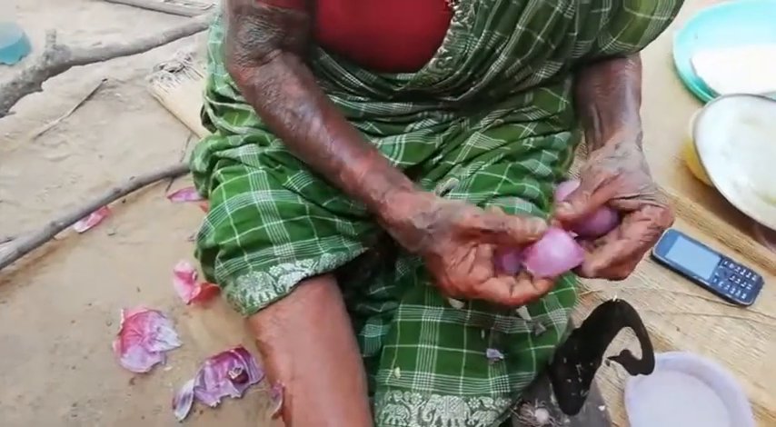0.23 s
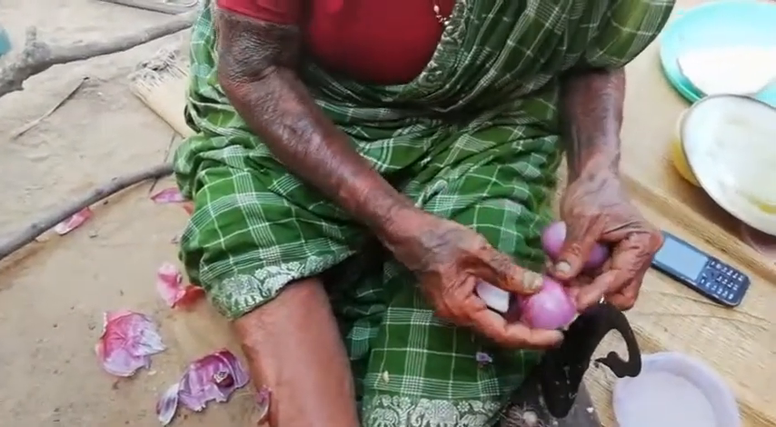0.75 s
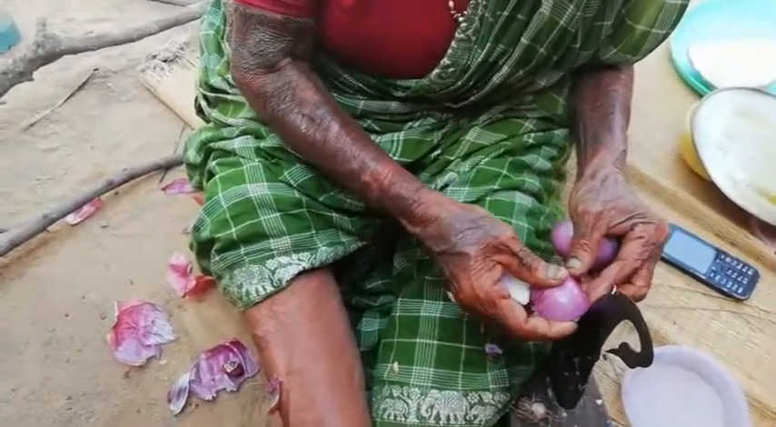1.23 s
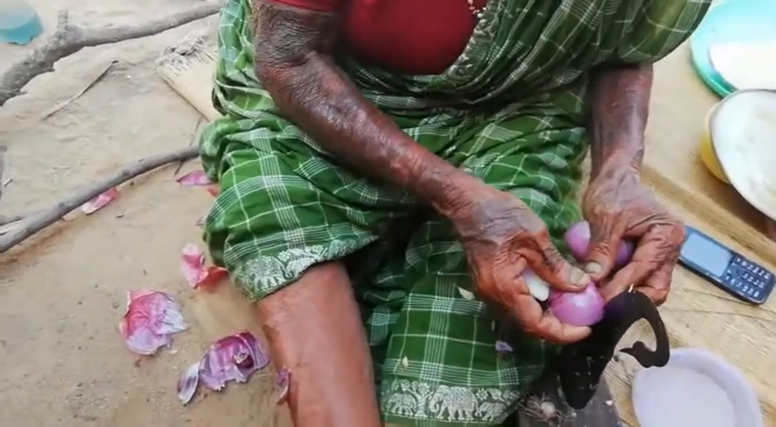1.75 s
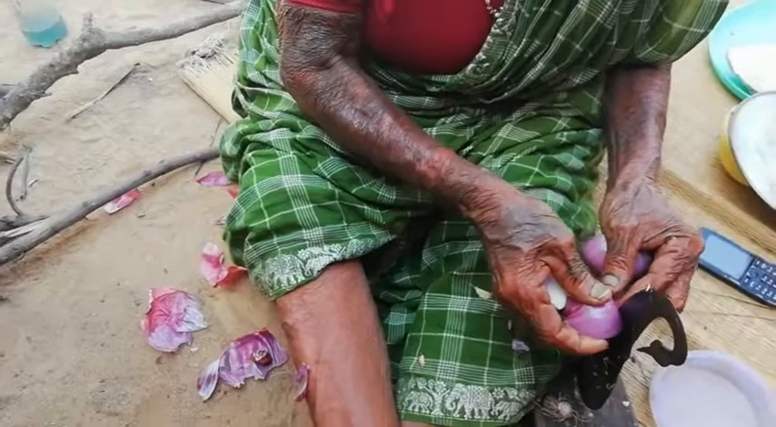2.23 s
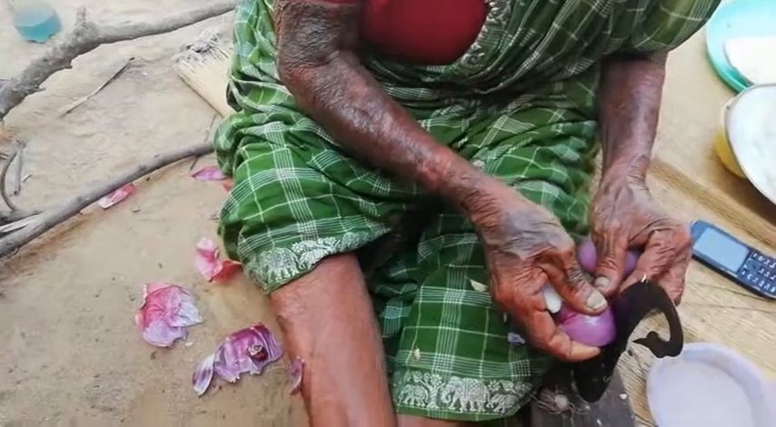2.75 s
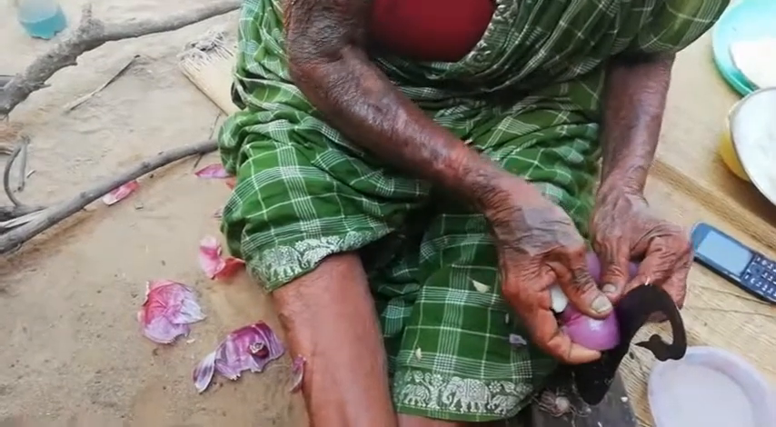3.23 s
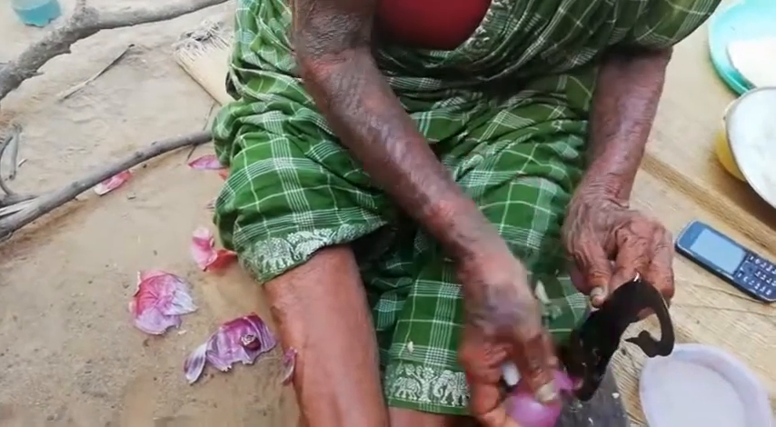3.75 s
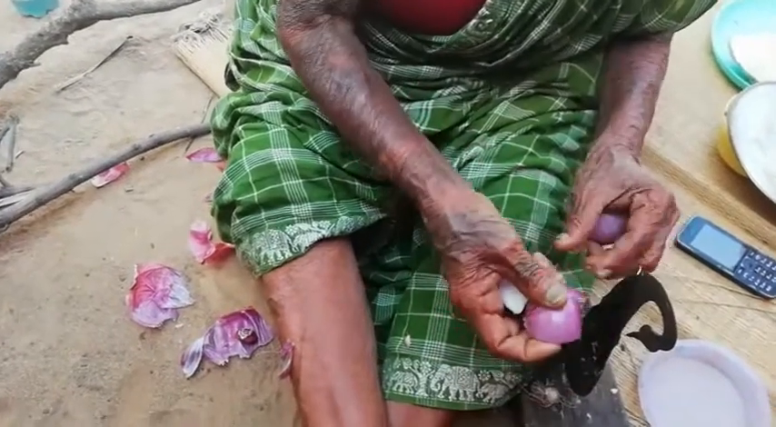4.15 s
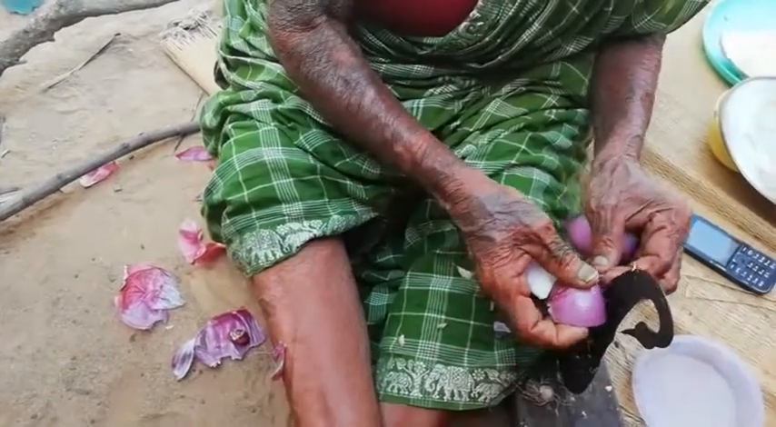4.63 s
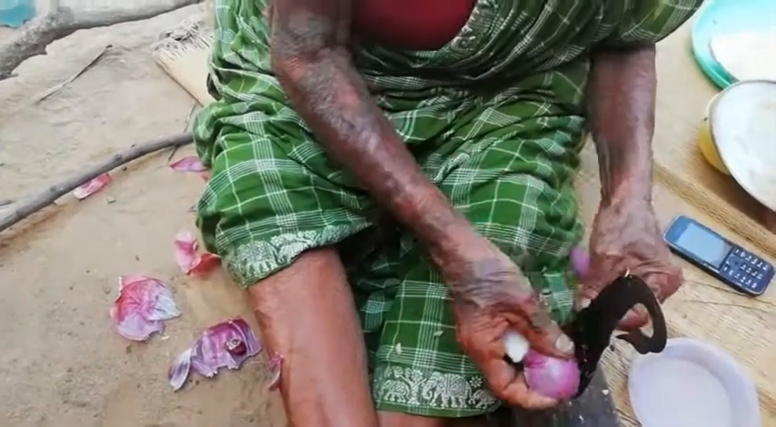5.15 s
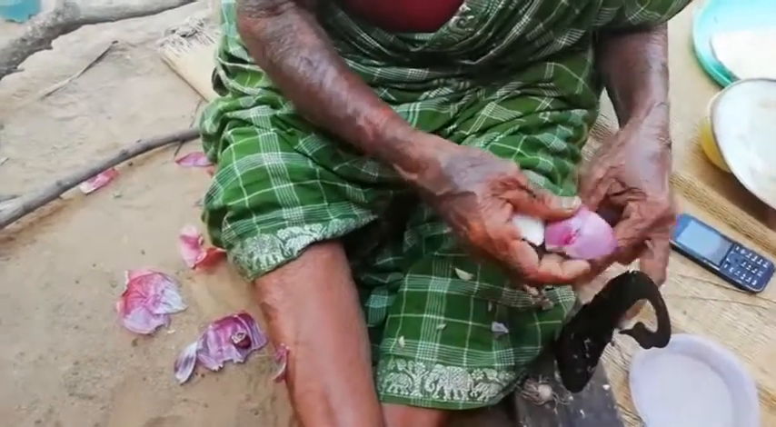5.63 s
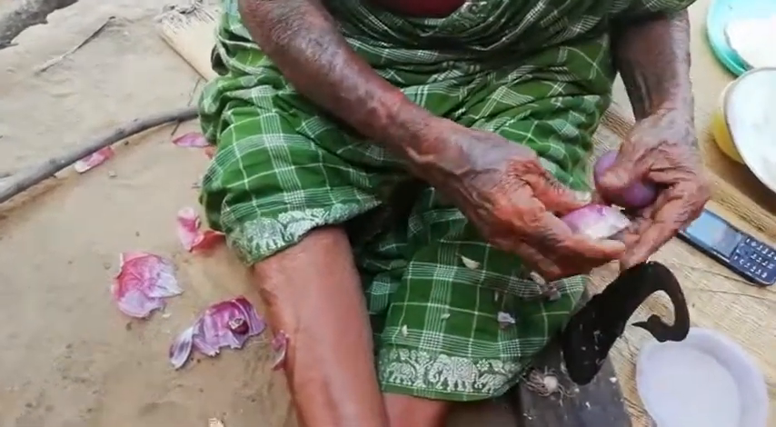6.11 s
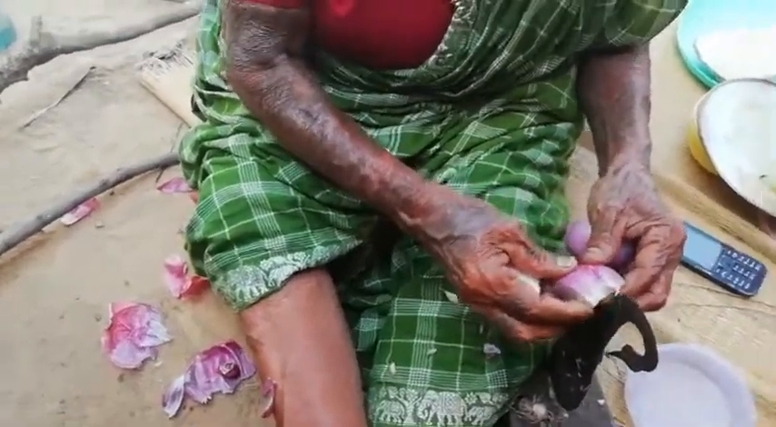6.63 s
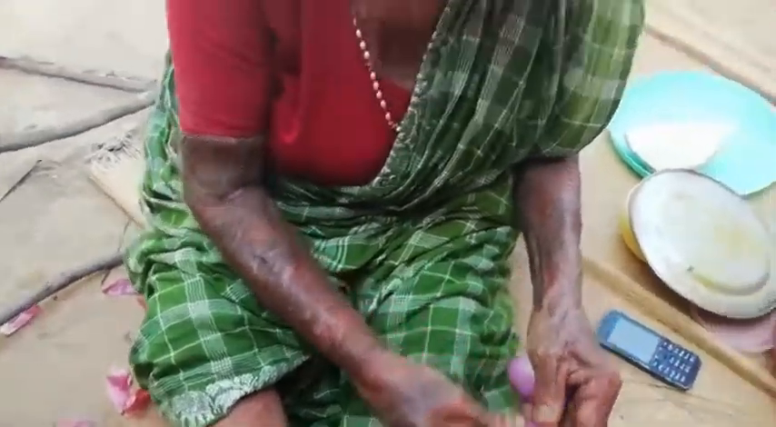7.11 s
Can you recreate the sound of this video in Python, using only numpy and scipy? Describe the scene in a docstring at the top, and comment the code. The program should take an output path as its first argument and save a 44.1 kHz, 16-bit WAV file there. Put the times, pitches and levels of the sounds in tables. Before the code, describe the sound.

Close to the microphone, an onion is peeled by hand, its skin rasping softly and breaking with small crisp snaps. About a second in, a hen a few steps to the right gives one drawn-out falling squawk, then clucks softly while chicks peep and whine. A far engine putters under faint birds and outdoor rumble and hiss. The peeling is loudest near the end.

```python
"""Peeling an onion in a farmyard

Close by, onion skin rasps as its fibres fracture and snaps as crisp layers break. A hen gives one drawn-out
squawk, then clucks softly, while chicks peep and whine: each voice is a vibrating membrane filtered by a
throat. Far away, the firings of a single-cylinder engine ring its exhaust. Soft low knocks sound now and then;
distant birds and outdoor rumble and hiss lie behind."""
import sys
import numpy as np
from scipy import signal
from scipy.fft import rfft, irfft, next_fast_len
from scipy.io import wavfile
from scipy.ndimage import uniform_filter1d

SR = 44100
rng = np.random.default_rng(int(sys.argv[2]) if len(sys.argv) > 2 else 0)


def persist_wave(psi):
    """Save psi, clipped to +-1, as 16-bit WAV."""
    counts = np.round(np.clip(psi, -1, 1) * 32767).astype(np.int16)
    wavfile.write(sys.argv[1], SR, np.atleast_2d(counts).T)


N = 325017
TIME = np.arange(N) / SR


# Peeling strokes: strongest_s, rise_s, fall_s, level_db (all table levels are relative)
STROKES = [(1.474, 0.077, 0.058, -48.5), (1.837, 0.2, 0.28, -50.5), (2.199, .016, 0.079, -46.5),
           (2.272, 0.16, 0.084, -45), (2.623, 0.2, 0.12, -49.5), (3.083, 0.11, 0.27, -44),
           (3.421, 0.16, 0.21, -43), (3.725, 0.19, 0.46, -58), (4.94, 0.11, 0.067, -44.5),
           (6.821, 0.42, 0.63, -55.5), (7.052, 0.028, 0.062, -40.5), (7.099, 0.13, 0.06, -35),
           (7.257, 0.035, 0.049, -34.5)]
# Spectrum of the peeling rasp as heard, microphone colour included: frequency_hz, gain_db
RASP_SPECTRUM = [(530, -36.5), (900, -31), (1400, -20), (1750, -19), (2200, -16), (2390, -16), (3670, -17),
                 (4940, -6), (6120, -6.5), (6980, -6), (7960, -25), (9980, -15), (15500, -19)]
# Modes of the damped blade, ringing under the skin: frequency_hz, width_hz, gain_db
BLADE_MODES = [(1483, 150, 6), (2244, 57, 1)]

def peeling(fibres_per_s=4000, size_db=4.0, patchy_db=3.5, swell_db=25):
    """Shot noise: skin tears fibre by fibre, a clumped crackle that swells and fades with each stroke."""
    power = np.zeros(N)
    for s, rise_s, fall_s, level_db in STROKES:
        stroke = [(s - rise_s, level_db - swell_db), (s, level_db), (s + fall_s, level_db - swell_db)]
        at, gate = span(stroke, 0.0033)
        power[at] += (gate * from_db(in_time(stroke, TIME[at])[0])) ** 2
    sizes = from_db(size_db * np.minimum(rng.exponential(1, N), 5) + patchy_db * drift(150, N))
    fractures = sizes * rng.choice([-1, 1], N) * (rng.random(N) < fibres_per_s / SR)
    crackle = np.sqrt(power) * rms_one(coloured(fractures, RASP_SPECTRUM))
    return crackle + sum(from_db(db) * resonance(crackle, hz, width) for hz, width, db in BLADE_MODES)


# Breaks in the skin: start_s, level_db, pan_db, edge_db
SNAPS = [(2.275, -27.5, -13.5, -15), (3.3811, -18, -2, -18), (3.4415, -25.5, -4, -13),
         (3.4602, -15.5, -10.5, -3), (3.981, -31, -9, -7), (5.6262, -18, -11, -6.5), (6.214, -35, -13, -2),
         (7.0446, -29, -6, -14), (7.093, -20, 6, -22), (7.102, -17, -11.5, -15), (7.271, -21.5, -1, -16),
         (7.277, -27, 1, -4)]
# Resonances of a snap: frequency_hz, width_hz, gain_db
SNAP_MODES = [(2590, 1100, 7), (5380, 510, 15.5), (6220, 430, 15)]

def snaps(decay_s=0.00097, gain_db=2, edge_hz=11000):
    """Impulsive excitation: a crisp layer breaks, and a millisecond burst rings damped modes."""
    out, t = np.zeros((2, N)), TIME[:SR // 50]
    band = signal.butter(2, [3300, 7600], "band", fs=SR, output="sos")
    for s, level_db, pan_db, edge_db in SNAPS:
        burst = rng.standard_normal((2, len(t))) * np.exp(-t / decay_s)
        ring = sum(from_db(db) * resonance(burst, hz, width) for hz, width, db in SNAP_MODES)
        crack = signal.sosfilt(band, ring) + from_db(edge_db) * resonance(burst, edge_hz, 4000)
        crack /= abs(crack).max(1, keepdims=True)
        out[:, int(s * SR):][:, :len(t)] += from_db(level_db + gain_db) * panned(crack, pan_db)
    return out


# Course of the hen's squawk: time_s, pitch_hz, lower_partials_db, upper_partials_db
SQUAWK = [(0.93, 486.6, -50, -59), (0.955, 458, -46.5, -60.5), (0.986, 409.7, -40.5, -46),
          (1.02, 423, -40.5, -41.5), (1.06, 444.8, -35, -33.5), (1.155, 423.3, -40, -33),
          (1.18, 404.7, -28, -29.5), (1.264, 370, -34, -31), (1.31, 360.8, -34.5, -37.5),
          (1.344, 353, -36.5, -48), (1.438, 355.2, -49.5, -60), (1.53, 329.9, -49.5, -60),
          (1.62, 313, -59.5, -80)]
# Her throat's response: frequency_hz, gain_db
SQUAWK_THROAT = [(400, -24.5), (600, -18.5), (800, -8.5), (1100, -19.5), (1500, -4), (2200, -2.5),
                 (2600, -3), (3200, 5.5), (3900, -16.5), (4900, -2), (5600, -8), (7000, -2.5),
                 (8000, -20.5), (15000, -40)]
# Her beak opens and closes: time_s, resonance_hz
BEAK_FORMANT = [(.96, 1320), (1.14, 1320), (1.17, 1640), (1.33, 1425), (1.42, 1200), (1.5, 892),
                (1.61, 810)]
# An upper throat resonance rises and rings out: time_s, resonance_hz, gain_db
SHRILL_FORMANT = [(1.21, 4600, -3), (1.26, 4880, 14.5), (1.32, 5040, 4)]
# She starts hoarse and clears: time_s, rasp_db (against the upper partials)
HOARSENESS = [(.99, 1), (1.06, -17), (1.18, -16), (1.32, -14)]

def squawk(beak_db=11, half_width_hz=220, lower_db=-1, upper_db=-2):
    """Source and filter: two moving formants shape a falling call that swells as the beak opens."""
    at, gate = span(SQUAWK, 0.022)
    pitch, low_db, high_db = in_time(SQUAWK, TIME[at])
    beak_hz, = in_time(BEAK_FORMANT, TIME[at])
    shrill_hz, shrill_db = in_time(SHRILL_FORMANT, TIME[at])
    rasp_db, = in_time(HOARSENESS, TIME[at])
    partials, hz = syrinx(pitch, SQUAWK_THROAT, jitter=0.003, flutter_db=3.0, count=32)
    for formant_hz, boost_db in [(beak_hz, beak_db), (shrill_hz, shrill_db)]:
        partials *= from_db(boost_db / (1 + ((hz - formant_hz) / half_width_hz) ** 2))
    upper_share = np.clip((hz - 1.1 * beak_hz) / 300, 0, 1)
    rasp = from_db(rasp_db) * rms_one(coloured(rng.standard_normal(N), SQUAWK_THROAT))[at]
    low = evened((partials * (1 - upper_share)).sum(0))
    high = evened((partials * upper_share).sum(0))
    out = np.zeros(N)
    out[at] = gate * (from_db(low_db + lower_db) * low + from_db(high_db + upper_db) * (high + rasp))
    return out


# The hen's clucks: start_s, length_s, pitch_hz, throat_hz, level_db, roughness
CLUCKS = [(2.53, 0.071, 338.3, 830, -47, 0.23), (2.657, 0.13, 361, 990, -47.5, 0.18),
          (2.814, 0.034, 370, 730, -50.5, 0.3), (3.281, 0.052, 263.4, 736, -41.5, 0.12),
          (3.305, 0.11, 342.5, 1080, -42.5, 0.13), (4.188, .12, 293.6, 710, -51, 0.46),
          (4.602, 0.171, 278, 255, -48.5, 0.13), (4.665, 0.28, 268.2, 953, -53, 0.16),
          (5.82, 0.083, 383, 720, -60, 0.15), (6.053, 0.15, 337.4, 947, -58, 0.2)]
# Her throat's response in a cluck: frequency_hz, gain_db
CLUCK_THROAT = [(250, 5.5), (500, -7), (700, -8.5), (1000, -3.5), (1300, -14), (3200, 9.5), (6000, -25)]

def clucks(pitch_sag=0.09, width_hz=190, upper_hz=1750, upper_db=-25):
    """Formant filtering: short hoarse tones, sagging in pitch, pass through two throat resonances."""
    out = np.zeros(N)
    for start, length, pitch_hz, throat_hz, level_db, roughness in CLUCKS:
        progress = np.linspace(0, 1, int(length * SR))
        pitch = pitch_hz * (1 - pitch_sag * progress)
        partials, _ = syrinx(pitch, CLUCK_THROAT, jitter=0.02, flutter_db=3.5, count=16)
        source = rms_one(partials.sum(0)) + 4 * roughness * rng.standard_normal(len(pitch))
        voice = resonance(source, throat_hz, width_hz)
        voice -= from_db(upper_db) * resonance(source, upper_hz, 1900)
        envelope = np.minimum(progress / 0.027, 1) * np.sqrt(1 - progress)
        out[int(start * SR):][:len(voice)] += from_db(level_db) * rms_one(voice) * envelope
    return out


# Chicks' peeps: start_s, loud_from_s, mid_fall_s, end_s, top_hz, bottom_hz, fall_s,
# level_db, overtones_db
PEEPS = [(1.628, 1.682, 1.693, 1.79, 3490, 2488, .011, -33, -7),
         (1.982, 1.999, 1.987, 2.035, 6000, 2680, .011, -37, -26),
         (1.992, 2.04, 2.066, 2.17, 3370, 2530, .013, -35, -13),
         (2.293, 2.318, 2.32, 2.4, 4500, 2300, .021, -35, -14),
         (4.03, 4.094, 4.103, 4.21, 3760, 2495, .012, -36, -6),
         (4.455, 4.496, 4.525, 4.62, 3430, 2536, .013, -37.5, -8),
         (4.97, 5.028, 5.042, 5.07, 3500, 1800, .0062, -39, -3),
         (6.272, 6.358, 6.37, 6.41, 3660, 2120, .01, -44.5, -9)]
# Spectral envelope of a peep as heard: frequency_hz, gain_db
PEEP_SPECTRUM = [(2500, -3), (3300, 0), (4400, -7), (5000, -26), (5600, -8), (6900, 1), (7700, -20),
                 (11000, -42)]

def peeps(scoop_hz=325, scoop_s=0.0161, swell_s=0.0081, hold_s=0.0053):
    """Frequency glide: a high note scoops up and drops in an S-curve; partway down it is heard suddenly louder."""
    out = np.zeros(N)
    for start, loud_from, middle, end, top_hz, bottom_hz, fall_s, level_db, overtones_db in PEEPS:
        t = np.arange(start, end, 1 / SR)
        pitch = bottom_hz + (top_hz - bottom_hz) / (1 + np.exp((t - middle) / fall_s))
        pitch -= scoop_hz * np.exp((start - t) / scoop_s)
        faint_db = np.interp(t, [loud_from - swell_s, loud_from], [6.5, 0])
        attack_db = np.interp(t - start, [0, 0.019], [13, 0])
        release_db = np.interp(t, [middle + hold_s, end], [0, 13.5])
        envelope_db = level_db - faint_db - attack_db - release_db
        call = np.column_stack([t, pitch, envelope_db, overtones_db + faint_db])
        out += chick(call, PEEP_SPECTRUM, rasp=0.55, jitter=0.015, flutter_db=3.5, count=3)
    return out


# Chicks' soft whines: start_s, length_s, level_db, overtones_db
WHINES = [(2.439, 0.16, -45.5, 11), (2.8, 0.3, -48.5, 3.5), (3.205, 0.21, -47, 3.5),
          (3.612, .24, -46.5, 12)]
# A chick's throat in a whine: frequency_hz, gain_db
WHINE_THROAT = [(1400, 0.5), (2900, 1), (4500, 2), (6000, 1), (7600, -13), (9500, -24)]

def whines(start_hz=1292, top_hz=1520, rise_s=0.05, attack_s=0.044, hold_s=0.12, fade_db=11):
    """Exponential approach: the pitch rises and levels off while the call swells, holds and fades."""
    out = np.zeros(N)
    for start, length, level_db, overtones_db in WHINES:
        t = np.arange(0, length, 1 / SR)
        pitch = top_hz + (start_hz - top_hz) * np.exp(-t / rise_s)
        below_db = fade_db * np.interp(t, [0, attack_s, attack_s + hold_s, length], [1, 0, 0, 1])
        call = np.column_stack([start + t, pitch, level_db - below_db, np.full(len(t), overtones_db)])
        out += chick(call, WHINE_THROAT, rasp=0.14, jitter=0.0072, flutter_db=5.0, count=5)
    return out


def chick(call, spectrum, rasp, jitter, flutter_db, count):
    """Amplitude modulation: fast random swings roughen a whistle with a few overtones."""
    at, gate = span(call, 0.006)
    pitch, level_db, overtones_db = in_time(call, TIME[at])
    partials, _ = syrinx(pitch, spectrum, jitter, flutter_db, count)
    partials *= 1 + rasp * drift(600, len(at))
    voice = rms_one(partials[0] + from_db(overtones_db) * partials[1:].sum(0))
    out = np.zeros(N)
    out[at] = gate * from_db(level_db) * voice
    return out


def syrinx(pitch, spectrum, jitter, flutter_db, count):
    """Harmonic series of an unsteady membrane, weighted by a spectrum: partials and their frequencies."""
    harmonic = np.arange(1, count + 1)[:, None]
    hz = harmonic * pitch
    phase = 2 * np.pi * np.cumsum(pitch * (1 + jitter * drift(407.4, len(pitch)))) / SR
    flutter = flutter_db * np.array([drift(70.7, len(pitch)) for _ in harmonic])
    strength = from_db(at_hz(spectrum, hz) + flutter) * (hz < CUTOFF_HZ)
    return strength * np.sin(harmonic * phase + rng.uniform(0, 2 * np.pi, harmonic.shape)), hz


# Running of the far engine: time_s, firing_rate_hz, exhaust_hz
ENGINE_RUN = [(0, 36.3, 173), (.6, 31.4, 172.8), (1.2, 32.1, 169.7), (3.6, 32.3, 171), (4.3, 22.9, 146),
              (4.7, 20.3, 126), (5.6, 20.7, 136.4), (7.37, 21.6, 143)]
# Its loudness: time_s, level_db
ENGINE_LEVEL = [(0, -48), (.21, -46), (.4, -53), (.48, -39.5), (.57, -51), (.69, -42), (.8, -46.5),
                (.94, -43.5), (1.3, -47), (2.39, -61.5), (4.35, -56.5), (4.63, -46.5), (5.23, -43.5),
                (5.94, -53.5), (7.2, -72)]

def engine(width_hz=68, boom_hz=62, boom_db=-14, uneven_db=1.0, scatter=0.042):
    """Pulsed resonance: each firing rings the exhaust and a deeper boom; distance leaves only bass."""
    rate, exhaust_hz = in_time(ENGINE_RUN)
    out, t = np.zeros(N + SR), TIME[:SR // 10]
    swell = t ** 2 * np.exp(-np.pi * width_hz * t)
    boom = from_db(boom_db) * np.sin(2 * np.pi * boom_hz * t)
    cycle = np.floor(np.cumsum(rate) / SR)
    for firing in np.flatnonzero(np.diff(cycle, prepend=-1)):
        ring = np.sin(2 * np.pi * exhaust_hz[firing] * (1 + scatter * rng.normal()) * t)
        out[firing:firing + len(t)] += from_db(uneven_db * rng.normal()) * swell * (ring + boom)
    return rms_one(out[:N]) * from_db(in_time(ENGINE_LEVEL)[0])


# Chirps beyond the yard: start_s, length_s, first_hz, last_hz, level_db, waver_share
CHIRPS = [(0, 0.33, 3080, 2905, -54.5, 0.04), (4.214, 0.1, 3290, 3410, -43, 0.068),
          (4.195, 0.14, 4950, 4700, -45.5, 0.047), (5.585, 0.035, 2840, 2876, -42, 0.032),
          (5.672, 0.068, 2527, 2940, -46, 0.074), (5.797, 0.064, 2264, 2784, -49.5, 0.125)]

def far_birds(gain_db=-6):
    """Random modulation: wavering pitch and strength spread gliding tones into thin or raspy chirps."""
    out = np.zeros(N)
    for start, length, first_hz, last_hz, level_db, waver in CHIRPS:
        size = int(length * SR)
        progress = np.linspace(0, 1, size)
        hz = (first_hz + (last_hz - first_hz) * progress) * (1 + waver * drift(900, size))
        tone = np.sin(2 * np.pi * np.cumsum(hz) / SR) * drift(400, size)
        arch = 2 * np.sqrt(progress * (1 - progress))
        out[int(start * SR):][:size] += from_db(level_db + gain_db) * tone * arch
    return out


# Soft low knocks: start_s, level_db
KNOCKS = [(2.151, -41), (2.255, -34.5), (2.726, -41)]

def knocks(hz=60, decay_s=0.0056):
    """Heavily damped oscillation: each dull knock dies within a few cycles."""
    out, t = np.zeros(N), TIME[:SR // 8]
    knock = t / decay_s * np.exp(1 - t / decay_s) * np.sin(2 * np.pi * hz * t)
    for s, level_db in KNOCKS:
        out[int(s * SR):][:len(t)] += from_db(level_db) * knock
    return out


# Spectrum of the outdoor background: frequency_hz, density_db
AIR_SPECTRUM = [(15, -73), (25, -0.5), (79, -6.5), (156, -3.5), (350, -17.5), (582, -26), (950, -21.5),
                (1200, -22), (1700, -22), (2420, -25.5), (3050, -20.5), (3720, -26), (5000, -20),
                (6210, -17.5), (7910, -34), (15500, -40.5)]
# Likeness of left and right: frequency_hz, correlation
AIR_COHERENCE = [(30, 1), (150, 1), (400, 0.55), (900, 0.11), (15000, 0.18)]
# Slow swell of the hiss: time_s, treble_gain_db
HISS_SWELL = [(.5, -1.5), (2.5, 2.5), (4.6, 7), (6.3, 3)]

def air(level_db=-51.5, left_treble_db=-3, hiss_hz=3000):
    """Partial coherence: rumble is alike on both sides, while a faint swelling hiss spreads wide."""
    mid, side = coloured(rng.standard_normal((2, N)), AIR_SPECTRUM)
    coherence = [(hz, np.clip(c, -0.99, 0.99)) for hz, c in AIR_COHERENCE]
    shared = coloured(mid, [(hz, 10 * np.log10(1 + c)) for hz, c in coherence])
    apart = coloured(side, [(hz, 10 * np.log10(1 - c)) for hz, c in coherence])
    left = coloured(shared + apart, [(300, 0.015), (3000, left_treble_db)])
    noise = from_db(level_db) * rms_one(np.array([left, shared - apart]))
    treble = signal.sosfilt(signal.butter(1, hiss_hz, "high", fs=SR, output="sos"), noise)
    return noise + (from_db(in_time(HISS_SWELL)[0]) - 1) * treble


def yard(x, wet_db, pan_db, early_db, t60_s=0.6, echoes_per_s=900):
    """Reverberation: direct sound, scattered echoes from ground and walls, and a short diffuse tail."""
    t = TIME[:SR // 2]
    shape = (2, len(t))
    tail = rng.standard_normal(shape) * from_db(-60 * t / t60_s) * (t > 0.008)
    early = rng.standard_normal(shape) * (rng.random(shape) < echoes_per_s / SR) * np.exp(-t / 0.013)
    response = sum(from_db(db) * part / np.linalg.norm(part, axis=1, keepdims=True)
                   for db, part in [(wet_db, tail), (early_db, early)])
    response[:, 0] += 1   # direct path
    return panned(signal.fftconvolve(x[None], response, axes=1)[:, :N], pan_db)


def panned(x, pan_db):
    """Interaural level difference: pan_db is left minus right."""
    return x * from_db(np.array([[pan_db], [-pan_db]]) / 2)


def from_the_right(x, lag_s):
    """Interaural time difference: the sound reaches the left side later."""
    return np.array([np.interp(TIME - lag_s, TIME, x[0]), x[1]])


def resonance(x, hz, width_hz):
    """Two-pole resonator with unit gain at its peak."""
    r = np.exp(-np.pi * width_hz / SR)
    feedback = [1, -2 * r * np.cos(2 * np.pi * hz / SR), r * r]
    return signal.lfilter(np.array([1, 0, -1]) * (1 - r * r) / 2, feedback, x)


def coloured(x, spectrum):
    """Filtering as multiplication of spectra."""
    size = next_fast_len(N)
    gain = from_db(at_hz(spectrum, np.linspace(0, SR / 2, size + 1)))
    return irfft(rfft(x, 2 * size) * gain)[..., :N]


def drift(rate_hz, size):
    """Slow noise: random values of unit spread, joined by straight lines."""
    knots = np.arange(size) * rate_hz / SR
    return np.interp(knots, np.arange(size), rng.standard_normal(size))


def span(rows, fade_s):
    """Time window: the samples that a curve covers, and a gate with soft ends."""
    at = np.flatnonzero((TIME > rows[0][0] - fade_s) & (TIME < rows[-1][0] + fade_s))
    t = TIME[at]
    return at, np.clip(np.minimum(t - t[0], t[-1] - t) / fade_s, 0, 1)


def in_time(rows, t=TIME):
    """Linear interpolation of each column of a curve at the times t."""
    s, *columns = np.transpose(rows)
    return [np.interp(t, s, column) for column in columns]


def at_hz(spectrum, hz):
    """Interpolation on a log-frequency axis."""
    knots_hz, values = np.transpose(spectrum)
    return np.interp(np.log(np.maximum(hz, 1)), np.log(knots_hz), values)


def evened(x):
    """Normalisation to unit power from moment to moment."""
    return x / np.sqrt(uniform_filter1d(x ** 2, size=900) + 1e-12)


def rms_one(x):
    """Normalisation to unit mean power."""
    return x / np.sqrt(np.mean(x ** 2) + 1e-20)


def from_db(db):
    """Decibels to amplitude ratio."""
    return 10 ** (np.asarray(db) / 20)


def scene():
    """Superposition: hands close by, fowl a few steps off to the right, the engine beyond the yard."""
    hen = from_the_right(yard(squawk(), wet_db=-10.5, pan_db=-4, early_db=2), lag_s=0.000362)
    clucking = yard(clucks(), wet_db=-6, pan_db=-3, early_db=0)
    peeping, whining = from_db(-2) * peeps(), from_db(-3.5) * whines()
    birds = yard(peeping, wet_db=-5, pan_db=-2.5, early_db=3)
    birds += yard(whining, wet_db=-10, pan_db=-4, early_db=0)
    birds += yard(far_birds(), wet_db=1, pan_db=-6, early_db=3)
    cracks = snaps()
    onion = yard(from_db(-2) * peeling(), wet_db=-26, pan_db=-10.5, early_db=6.5) + cracks
    onion += yard(from_db(-12) * cracks.mean(0), wet_db=0, pan_db=-8, early_db=4)
    background = from_the_right(clucking + engine() + knocks() + air(), lag_s=0.00059)
    return onion + hen + birds + background


CUTOFF_HZ = 15800

def record(dry):
    """Band limiting: a steep elliptic low-pass removes the highest treble."""
    return signal.sosfilt(signal.ellip(10, 0.2, 80, CUTOFF_HZ, fs=SR, output="sos"), dry)


dry = scene()
out = record(dry)
persist_wave(out)
```